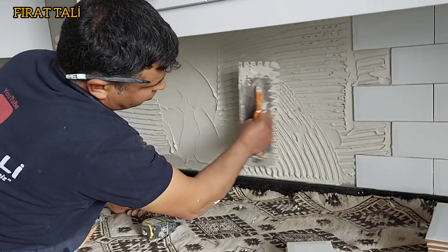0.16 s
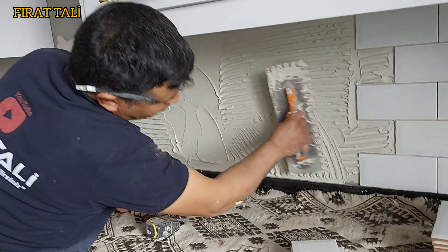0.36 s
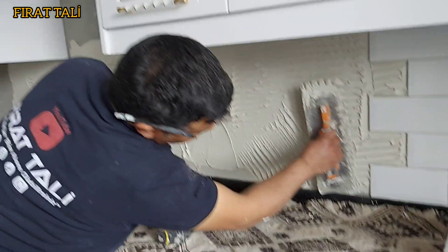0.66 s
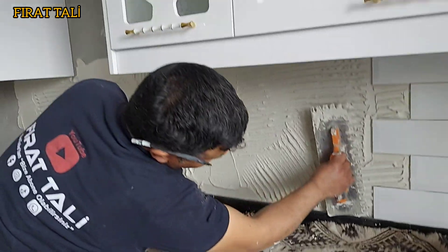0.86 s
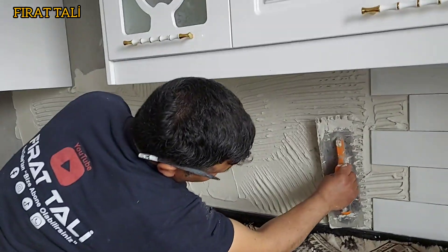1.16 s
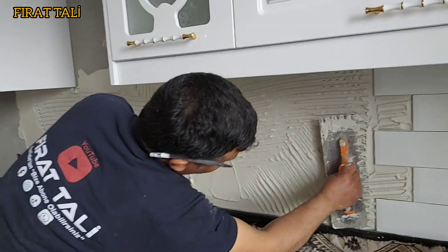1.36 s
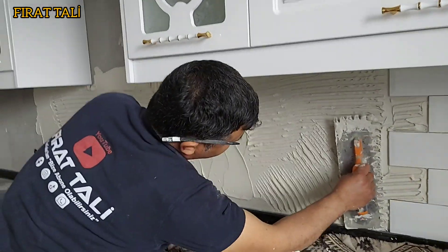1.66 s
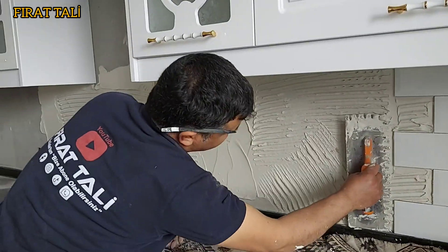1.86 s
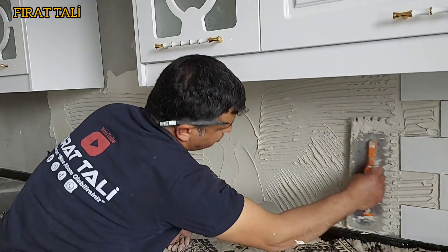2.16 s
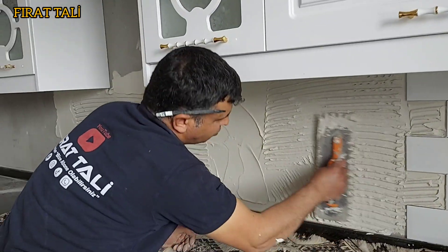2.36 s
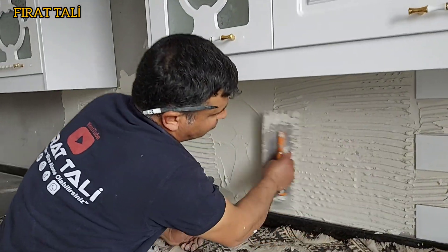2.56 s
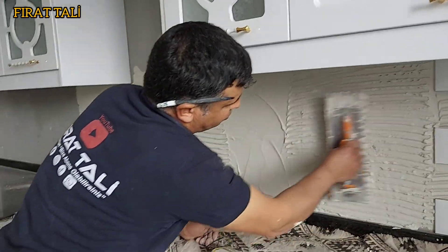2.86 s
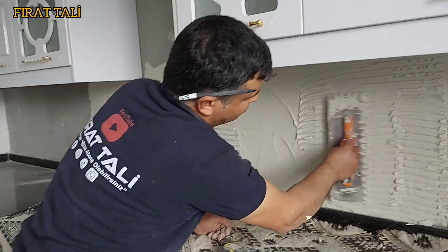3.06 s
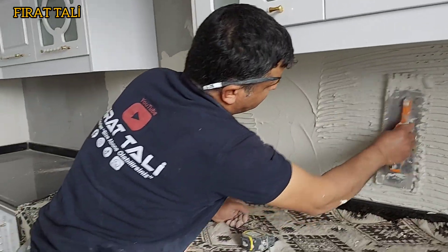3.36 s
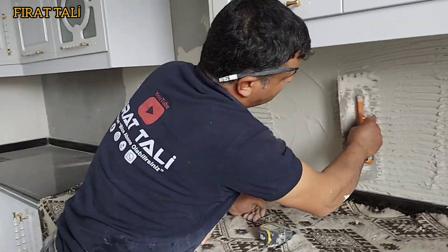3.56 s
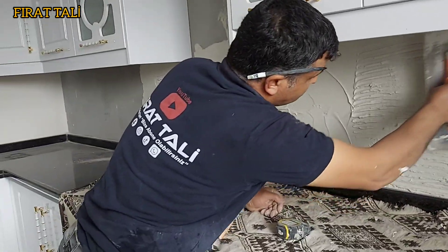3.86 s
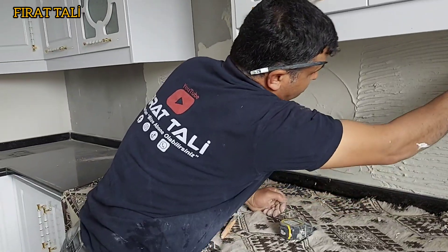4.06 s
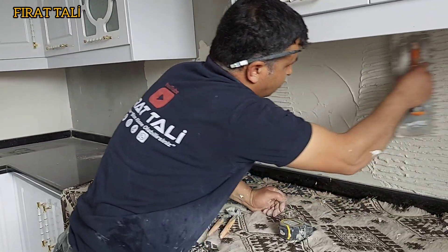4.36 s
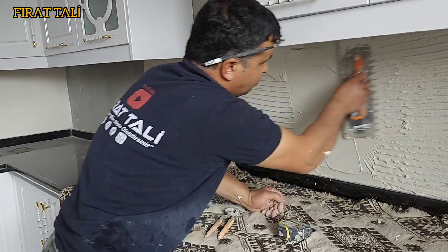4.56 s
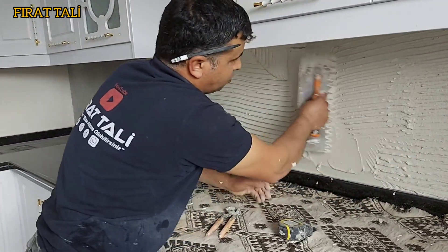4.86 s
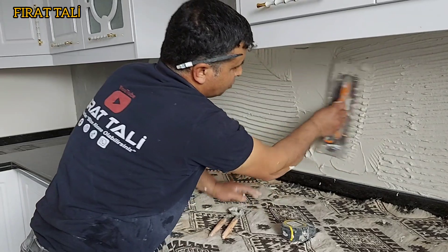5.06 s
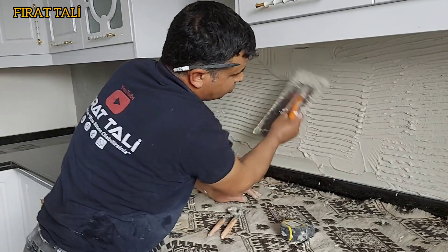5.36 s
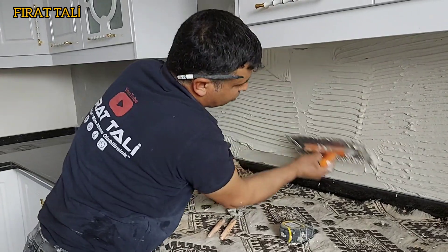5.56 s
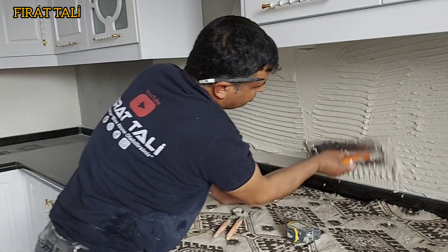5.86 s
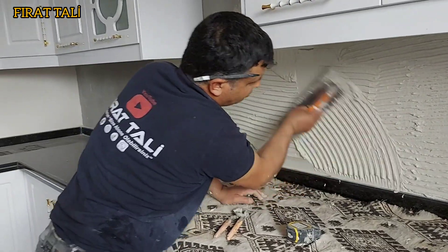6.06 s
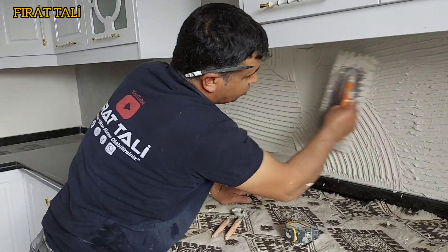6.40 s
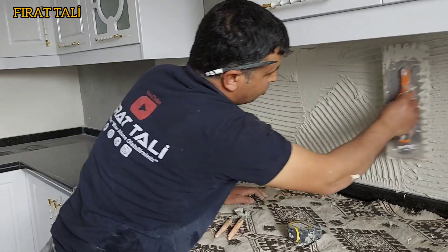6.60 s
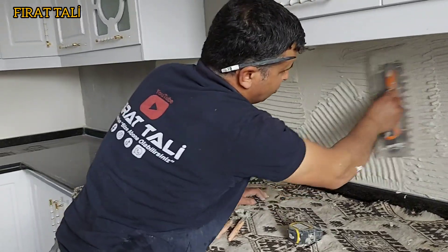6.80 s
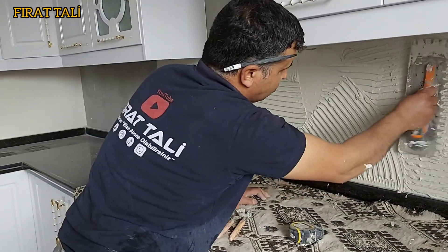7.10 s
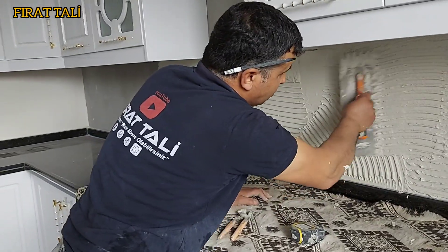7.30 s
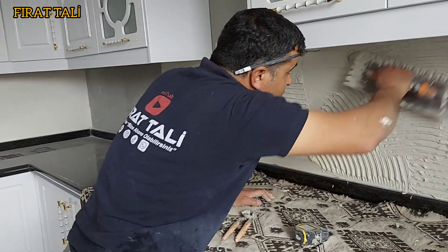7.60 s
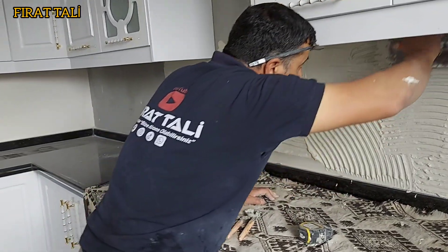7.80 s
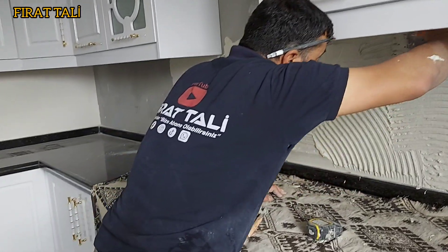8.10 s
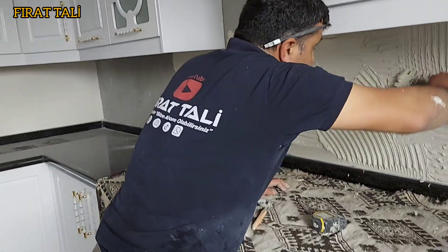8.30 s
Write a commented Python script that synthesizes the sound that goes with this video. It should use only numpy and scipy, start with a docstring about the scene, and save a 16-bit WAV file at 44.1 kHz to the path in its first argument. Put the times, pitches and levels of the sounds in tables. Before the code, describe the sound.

Sandy, hissing trowel scrapes repeat in a hard echoing kitchen, with metallic taps, soft cloth rustles and a quick run of hollow cabinet bumps.

```python
"""A bare, hard kitchen: a notched steel trowel combs tile adhesive over the wall, in long and short strokes.
Sand grains fracture under its teeth, wet paste hisses, and the blade hums, squeaks, ticks and rings in dying modes.
There is one chink, one clap on the wall, and a quick run of bumps on a hollow cabinet.
Clothes shuffle, or rustle and chirp close to the two microphones; soft booms lie below.
The room answers with decaying echoes, over still air and a faint appliance hum."""
import sys
import numpy as np
from scipy import signal
from scipy.fft import rfft, irfft, next_fast_len
from scipy.io import wavfile

SR = 44100
rng = np.random.default_rng(int(sys.argv[2]) if len(sys.argv) > 2 else 0)


def dump_mix(stems):
    """Bounce the given channels to the path in sys.argv[1] as a 16-bit WAV at rate SR."""
    frames = np.atleast_2d(stems).T  # one column per channel
    limited = np.clip(frames, -1, 1)  # hard clip at full scale
    pcm = np.round(limited * 32767).astype(np.int16)
    wavfile.write(sys.argv[1], SR, pcm)


N = 372182
TIME = np.arange(N) / SR  # s


def gain_of(db):
    """Decibels to a factor."""
    return 10 ** (np.asarray(db) / 20)


def evened(x):
    """Scales to rms 1."""
    return x / np.sqrt(np.mean(x ** 2) + 1e-20)


def read(points, hz):
    """Reads a table of (f/Hz, value) on a log-frequency axis."""
    f, value = np.transpose(points)
    return np.interp(np.log(hz + 1), np.log(f + 1), value)


def coloured(x, spectrum):
    """Gives x a spectrum, at rms 1."""
    size = next_fast_len(x.shape[-1])
    gain = gain_of(read(spectrum, np.fft.rfftfreq(size, 1 / SR)))
    return evened(irfft(rfft(x, size) * gain, size)[..., :x.shape[-1]])


def wander(per_s):
    """A random curve of rms 1 with per_s corners a second; it stays level after 4096 corners."""
    return evened(np.interp(TIME * per_s, np.arange(4096), rng.standard_normal(4096)))


def grains(per_s, spread_db):
    """Tiny fractures at random moments: many small, a few large."""
    size = gain_of(spread_db * np.minimum(rng.exponential(1, N), 5))
    sign = rng.choice([-1, 1], N)
    return evened(size * sign * (rng.random(N) < per_s / SR))


def swell(s, rise_s, hold_s, fall_s):
    """A gain that reaches 1 at s, holds, and falls; rise and fall are the times for a factor of ten."""
    early = np.maximum(s - TIME, 0)
    late = np.maximum(TIME - s - hold_s, 0)
    return 10 ** -np.minimum(early / rise_s + late / fall_s, 10)


def resonate(x, hz, width):
    """A resonance that follows the curve hz: shift it down to 0 Hz, smooth twice, shift back."""
    turn = np.exp(2j * np.pi * np.cumsum(hz) / SR)
    r = np.exp(-np.pi * width / SR)
    smooth = signal.sosfilt([[1 - r, 0, 0, 1, -r, 0]] * 2, x / turn)
    return evened((turn * smooth).real)


def add(mix, s, db, sound):
    """Places a blow whose energy equals that of 10 ms at the level db."""
    part = mix[round(s * SR):][:len(sound)]
    scale = np.sqrt(SR / 100 / np.sum(sound ** 2))
    part += (gain_of(db) * sound * scale)[:len(part)]


def ring(modes, tilt_db, split, count):
    """Dying modes, each a cluster of close pitches; tilt_db per octave above the first mode brightens them."""
    t = TIME[:SR // 3]
    hz, db, t60 = np.transpose(np.repeat(modes, count, axis=0))[:, :, None]
    shift, phase = 1 + split * rng.uniform(-1.26, 1, hz.shape), rng.random(hz.shape)
    level = gain_of(db + tilt_db * np.log2(hz / hz[0]))
    decay = np.exp(-np.log(1000) * t / t60)
    return np.sum(level * decay * np.sin(2 * np.pi * (hz * shift * t + phase)), 0)


# the trowel pressed along the wall: (t/s of full bite, rise/s, hold/s, fall/s,
# mid-stroke scrape level/dB, hum and hiss level/dB relative to the scrape)
STROKES = [(2.326, 0.18, 0.27, 0.042, -18.5, -12, -9.5), (3.065, 0.056, 0.064, 0.038, -20.5, -11.5, -8.5),
           (3.472, 0.041, 0.048, 0.071, -17, -7, -8), (4.28, 0.15, 0.24, 0.15, -19.5, -14.5, -9),
           (4.638, 0.3, 0.07, 0.06, -19.5, -4.5, -7), (5.155, 0.084, 0.046, 0.084, -18.5, -2, -9),
           (5.921, 0.096, 0.19, 0.041, -18, -10, -8.5), (6.811, 0.031, 0.058, 0.042, -23, -5.5, -6.5),
           (7.221, 0.054, 0.074, 0.097, -16.5, -9, -9.5), (8.215, 0.083, 0.042, 0.049, -17.5, -8.5, -12)]
# the blade skimming lightly between strokes: (t/s, hold/s, scrape level/dB, hum level/dB, hiss level/dB)
SKIMS = [(0, 0.0051, -26, -28, -44.5), (.16, 0.37, -56, -59, -69.5), (2.152, 0.02, -38.5, -47.5, -54.5),
         (2.72, 0.086, -50, -41.5, -63), (2.96, .06, -47, -46, -62), (3.252, .18, -37.5, -55, -47.5),
         (3.62, 0.19, -46.5, -44, -56.5), (3.883, 0.31, -51, -69, -57), (4.824, 0.14, -43.5, -50, -51),
         (5.039, 0.12, -36, -52, -38.5), (5.395, 0.18, -48, -65, -53), (5.777, 0.17, -47.5, -47, -51.5),
         (6.232, 0.14, -46.5, -49, -52.5), (6.556, 0.092, -45, -78, -50), (6.64, 0.018, -37, -83, -42.5),
         (6.743, 0.032, -49, -49, -43), (7.02, 0.07, -41.5, -41.5, -48.5), (7.424, 0.14, -46, -49, -53.5),
         (7.54, 0.28, -56, -76, -57.5), (7.977, 0.075, -46.5, -54.5, -49.5)]
# coarse sand under the teeth, relative: (f/Hz, level/dB per Hz)
GRIT = [(25, -55), (60, -39.5), (140, -21.5), (250, -15), (450, -11.5), (750, -5), (1300, -1.5),
        (2000, -0.5), (3200, 2), (4700, 3), (5600, 5), (6100, 4), (6900, -18.5), (9000, -27), (16000, -52)]
# fine hiss of wet paste, relative: (f/Hz, level/dB per Hz)
HISS = [(4000, -44), (6500, 1.5), (8000, -2), (10000, 1), (12000, 2.5), (14000, 1.5), (16000, -1)]
# the blade dragged along the wall: (f/Hz, width/Hz, relative level/dB)
BLADE_HUM = [(1041, 147, 3), (1358, 307, 2), (718, 366, -1.5)]
SWELL_DB = 3  # pressure grows through a stroke
LEAD_IN = 1.26  # the teeth first touch this many rise times before they bite fully
HUM_AT = 0.85  # share of a stroke after which the hum has its listed relative level
HUM_GROWTH_DB, HISS_LOSS_DB = 14.5, 3  # as the paste runs thin the blade hums more and the wet hiss dies
SKIM_RISE_S, SKIM_FALL_S = .05, 0.05


def scrape():
    """Sand grinds under the teeth in uneven catches; the drag sets the blade humming as it flexes."""
    catch = gain_of(1.2 * wander(110) + .5 * wander(30))
    grit = coloured(grains(per_s=7000, spread_db=2.5) * catch, GRIT)
    hiss = coloured(grains(per_s=9000, spread_db=2.0) * catch, HISS)
    drag = grains(per_s=1500, spread_db=3.5) * catch * gain_of(2 * wander(40))
    flex = 1 + 0.029 * wander(12)
    hum = evened(sum(gain_of(db) * resonate(drag, hz * flex, width) for hz, width, db in BLADE_HUM))
    power = np.zeros((3, N))  # of grit, hum and hiss
    for s, rise_s, hold_s, fall_s, db, hum_db, hiss_db in STROKES:
        done = np.clip((TIME - s) / (hold_s + fall_s / 2), 0, 1)
        press = swell(s, rise_s, hold_s, fall_s) * gain_of(db + SWELL_DB * (done - .5))
        press *= np.clip((TIME - s) / rise_s + LEAD_IN, 0, .5) * 2  # no contact before the approach
        power[0] += press ** 2
        power[1] += (press * gain_of(hum_db + HUM_GROWTH_DB * (done - HUM_AT))) ** 2
        power[2] += (press * gain_of(hiss_db - HISS_LOSS_DB * (done - .5))) ** 2
    for s, hold_s, *dbs in SKIMS:
        skim = swell(s, SKIM_RISE_S, hold_s, SKIM_FALL_S)
        power += np.outer(gain_of(dbs) ** 2, skim ** 2)
    return np.sum(np.sqrt(power) * [grit, hum, hiss], 0)


# the blade meets the wall: (t/s, tick level/dB, ring level/dB, ring brightness/dB per octave)
TAPS = [(.331, -24, -14, -2.5), (.357, -24, -11.5, -1), (.391, -46, -16, 22), (0.958, -50, -55, -13),
        (1.063, -42, -37.5, -24), (1.700, -39.5, -51, -6), (2.942, -39, -62, 10), (4.046, -47, -50, -4),
        (5.780, -37.5, -58, 14), (5.839, -28, -33, 12), (6.749, -26.5, -53, -4), (6.812, -29, -21.5, 12),
        (7.006, -30, -52, -7.5), (7.040, -24.5, -65, -7), (7.135, -39, -30.5, 1), (7.195, -34, -20, -4.5),
        (7.965, -34.5, -47, 8), (8.15, -34, -31, 8)]
# the blade when struck: (f/Hz, relative level/dB, longest t60/s)
BLADE = [(1668, -4.5, .05), (1767, -8.5, 0.12), (2250, -24, 0.043), (2430, -12, 0.04), (2600, -21.5, 0.032),
         (2996, -8, 0.093), (3660, -12, 0.049), (3920, -21, .05), (4720, -5, 0.18), (5100, -3.5, .04),
         (5630, 15.5, 0.042), (5620, 8, 0.057), (5800, -2, 0.06), (6200, -4, 0.15), (7600, -17, .04)]
# gritty contact, relative: (f/Hz, level/dB per Hz)
TICK = [(30, -51), (100, -8), (350, 3), (900, -7), (2300, 9), (4200, 8), (5800, 13), (7000, -15.5),
        (10000, -10), (16000, -26.5)]


def taps(tick_s=0.0038, buzz_db=-6, buzz_s=0.013):
    """The steel edge lands with a gritty tick; the blade rings in a smeared splash and buzzes on the sand."""
    out, t = np.zeros(N), TIME[:SR // 3]
    for s, tick_db, ring_db, tilt_db in TAPS:
        tick, buzz = coloured(rng.standard_normal((2, len(t))), TICK)
        # light touches stay in the paste, which damps the ring
        free = np.clip(gain_of(.6 * (ring_db + 11)), .35, 1)
        modes = np.multiply(BLADE, [1, 1, free])
        add(out, s, tick_db, tick * np.exp(-t / tick_s))
        add(out, s, ring_db + buzz_db, buzz * np.exp(-t / buzz_s))
        add(out, s, ring_db, ring(modes, tilt_db, split=0.0338, count=8))
    return out


# short glides, the blade singing low or squeaking on wet paste, and a chirp of cloth at 1.2 s:
# (t/s, length/s, start f/Hz, end f/Hz, level/dB, pitch jitter/Hz)
SQUEAKS = [(0, 0.038, 1043, 1058, -31, 80), (.968, .058, 2305, 1825, -52.5, 161),
           (1.057, 0.0152, 3200, 2380, -40, 200), (1.197, 0.015, 2660, 4190, -39.5, 80),
           (2.529, 0.069, 960, 1035, -25.5, 121.6), (3.103, 0.034, 1015, 1027, -30.5, 109.9),
           (3.266, 0.11, 1130, 1088, -43, 192), (4.231, 0.078, 1248, 1207, -30.5, 190.9),
           (4.317, 0.082, 1110, 1038, -29.5, 257.6), (4.418, .07, 1040, 1090, -31.5, 240),
           (7.133, 0.0068, 5550, 5350, -30, 150), (7.689, 0.062, 5980, 5770, -46, 110)]


def squeaks(waver=0.00616):
    """Short glides of the blade and one cloth chirp, rough early on; later the jitter is a steady offset."""
    out = np.zeros(N)
    for s, length, start_hz, end_hz, db, jitter_hz in SQUEAKS:
        u = np.clip((TIME - s) / length, 0, 1)
        glide = start_hz + (end_hz - start_hz) * u
        # at 1200 corners a second the jitter curve goes level at 3.4 s
        hz = glide * (1 + waver * wander(120)) + jitter_hz * wander(1200)
        out += gain_of(db) * 2 * np.sin(np.pi * u) * np.sin(2 * np.pi * np.cumsum(hz) / SR)
    return out


# a light, free chink of steel: (f/Hz, relative level/dB, t60/s)
CHINK = [(1785, -3.5, 0.29), (2760, -1, 0.12), (3200, 6, 0.11), (3430, 3, 0.15), (3640, 3, 0.08),
         (4650, 8, 0.084), (5400, -10, .06), (5960, -1, 0.072), (7800, -24, .2)]
# when it chinks: (t/s, level/dB)
CHINKS = [(1.699, -33.5)]
# the flat of the trowel on the wall: (f/Hz, relative level/dB, t60/s)
CLAP = [(807, 2, .07), (834, 0.5, 0.088), (1260, -4, 0.049), (2084, 7, 0.056), (2180, 2, 0.079),
        (2830, -17, 0.052), (4220, -7, 0.055), (5030, 5, 0.043), (5240, -12, .05)]
# when it claps: (t/s, level/dB)
CLAPS = [(7.965, -36)]
# the hollow cabinet: (f/Hz, relative level/dB, t60/s)
CABINET = [(134, -15, 0.14), (199, -12, .09), (229, -12.5, 0.32), (275, 8, 0.19), (305, -2, 0.18),
           (367, -15, 0.054), (434, 6.5, 0.069), (580, -1, 0.049), (683, -3, 0.054), (807, -11, 0.051),
           (895, -3, 0.045), (1240, -13.5, 0.061)]
# bumps against it: (t/s, level/dB, brightness/dB per octave)
BUMPS = [(4.045, -19, 4), (4.072, -16, -5.5), (4.121, -19, -8), (4.152, -21.5, -5), (4.176, -24, 3.5)]


def knocks():
    """Struck modes: a steel chink, the trowel clapping on the wall and stumbles against the hollow cabinet."""
    out = np.zeros(N)
    for s, db in CHINKS:
        add(out, s, db, ring(CHINK, 0, split=0.0142, count=5))
    for s, db in CLAPS:
        add(out, s, db, ring(CLAP, 0, split=0.058, count=5))
    for s, db, tilt_db in BUMPS:
        add(out, s, db, ring(CABINET, tilt_db, split=0.005, count=1))
    # small panels radiate little bass
    return signal.sosfilt(signal.butter(2, [70, 8000], "band", fs=SR, output="sos"), out)


# dull shuffling: (t/s at its height, rise/s, fall/s, level/dB, centre of its hollow colour f/Hz)
SHUFFLES = [(0, .02, 0.071, -41, 560), (.08, 0.026, .12, -33, 367), (0.389, 0.048, 0.053, -28, 374),
            (.44, 0.051, 0.031, -34, 337), (.86, 0.085, 0.28, -48, 252), (1.13, .13, .12, -32.5, 495),
            (1.345, 0.14, 0.032, -47, 269), (2.845, 0.026, 0.077, -31.5, 550),
            (2.888, 0.075, 0.051, -33.5, 307), (2.97, 0.054, .06, -40, 458), (4.72, 0.19, 0.14, -36, 400),
            (5.04, .05, 0.33, -43, 277), (5.21, 0.21, 0.047, -34, 487), (5.785, 0.012, 0.2, -42, 254),
            (5.93, 0.069, 0.18, -36, 433), (6.1, 0.16, 0.15, -33, 467), (7.07, 0.13, 0.16, -40, 515),
            (7.34, 0.16, 0.17, -39, 433), (7.97, .01, 0.35, -59, 470)]
# the dull part of its colour, relative: (f/Hz, level/dB per Hz)
SHUFFLE = [(25, -42), (70, -35), (160, -15.5), (250, 1), (500, -1.5), (750, -7), (1400, -12.5),
           (2500, -12.5), (4500, -23), (9000, -54)]


def shuffles():
    """Clothes slip softly and dully, with a hollow colour that shifts from move to move."""
    s, *_, hz = np.transpose(SHUFFLES)
    hollow = resonate(grains(per_s=900, spread_db=2.5), np.interp(TIME, s, hz), width=165)
    dull = coloured(grains(per_s=1500, spread_db=5.5), SHUFFLE)
    slips = evened(hollow + gain_of(0.5) * dull)
    moves = [gain_of(db) * swell(at, rise_s, 0, fall_s) for at, rise_s, fall_s, db, _ in SHUFFLES]
    return slips * np.max(moves, 0)


# cloth close by: (t/s at its height, rise/s, hold/s, fall/s, rustle level/dB, rumble level/dB)
RUSTLES = [(1.237, 0.17, .05, .08, -40.5, -59), (1.323, 0.053, 0.093, 0.11, -33.5, -51),
           (1.607, 0.013, .005, .06, -51, -54), (1.652, 0.054, 0.0063, 0.092, -42.5, -48)]
# rustling fibres, relative: (f/Hz, level/dB per Hz)
CLOTH = [(100, -2), (300, 6), (550, 0), (1100, -5), (1450, 0), (2400, 0), (3200, -7.5), (4500, -3),
         (5600, 6.5), (6800, -15), (9500, -17), (12200, -14), (16000, -25)]
# the low rumble beneath, relative: (f/Hz, level/dB per Hz)
RUMBLE = [(20, -24), (35, -8.5), (55, 0), (80, -2), (120, -5), (220, -14), (500, -38)]


def rustles():
    """Fibres catch and slip near the microphones, over a low rumble."""
    fibres = coloured(grains(per_s=6400, spread_db=1.5) * gain_of(2.1 * wander(70.03)), CLOTH)
    rumble = coloured(rng.standard_normal(N), RUMBLE)
    out = np.zeros(N)
    for *shape, db, rumble_db in RUSTLES:
        out += swell(*shape) * (gain_of(db) * fibres + gain_of(rumble_db) * rumble)
    return out


# deep booms: (t/s, hold/s, f/Hz, level/dB)
BOOMS = [(1.366, 0.06, 57.6, -47), (1.605, .015, 77.5, -54), (5.97, .3, 58, -63), (6.787, .07, 52, -62),
         (7.18, 0.069, 54.7, -64)]


def booms(rise_s=0.023, fall_s=0.048, waver=.05):
    """Soft, deep booms of wavering pitch as weight shifts on the worktop."""
    out = np.zeros(N)
    for s, hold_s, hz, db in BOOMS:
        turns = np.cumsum(hz * (1 + waver * wander(31))) / SR
        out += gain_of(db) * swell(s, rise_s, hold_s, fall_s) * np.sqrt(2) * np.sin(2 * np.pi * turns)
    return out


# likeness of the left and right channels, nearly mono above 7 kHz: (f/Hz, correlation from -1 to 1)
LIKENESS = [(50, -0.064), (250, 0.78), (550, 0.65), (900, -0.087), (1400, -0.48), (2400, 0.15),
            (3300, -0.34), (4500, -0.26), (6300, -0.35), (7000, 0.81), (16000, 0.94)]


def paired(two):
    """Makes two unrelated noises as alike as the two channels."""
    size = next_fast_len(two.shape[-1])
    a, b = rfft(two, size)
    same = np.clip(read(LIKENESS, np.fft.rfftfreq(size, 1 / SR)), -1, 1)
    return irfft(np.array([same * a + np.sqrt(1 - same ** 2) * b, a]), size)[:, :two.shape[-1]]


# how long the hard walls ring: (f/Hz, t60/s)
ROOM_T60 = [(100, 1), (300, 0.84), (1000, 0.75), (3000, 0.63), (5700, 0.47), (8000, 0.41), (15000, 0.22)]
# strength of the reflections, relative: (f/Hz, level/dB)
ROOM_WET = [(80, -5.5), (300, -7.5), (1000, 2.5), (5500, -2), (8000, -4), (15000, -5)]


def room(x, gap_s=.003):
    """Reflections from hard walls: sparse echoes after a short gap, each band dying at its own speed."""
    echoes = rng.standard_normal((2, SR)) * (rng.random((2, SR)) < 5000 / SR)
    hz, t, z = signal.stft(paired(echoes), SR, nperseg=256)
    t60 = read(ROOM_T60, hz)[:, None]
    decay = np.exp(-np.log(1000) * t / t60) * np.sqrt(2 * np.log(1000) / t60)  # equal energy for any t60
    z = z * gain_of(read(ROOM_WET, hz))[:, None] * decay
    tail = signal.istft(z, SR, nperseg=256)[1] / np.linalg.norm(echoes[0])
    tail = np.pad(tail, ((0, 0), (round(gap_s * SR), 0)))
    return signal.fftconvolve(x[None], tail, axes=1)[:, :N]


def moving_room(x, count=6):
    """Contact shifts along the long blade: echo patterns crossfade in a ring, five rounds a second."""
    turns = 5 * TIME
    shares = np.array([np.maximum(np.cos(2 * np.pi * (turns + k / count)) - .5, 0) for k in range(count)])
    shares /= np.linalg.norm(shares, axis=0)  # constant total power
    return sum(room(x * share) for share in shares)


# the quiet room, relative: (f/Hz, level/dB per Hz)
AIR = [(20, -33), (33, -18.5), (48, -23), (62, -0.5), (90, -9.5), (200, -9), (500, -11), (1500, -13.5),
       (5500, -14.5), (7000, -30), (16000, -37)]
AIR_DB = -60.5
# an appliance's hum: (f/Hz, level/dB)
HUM = [(65.5, -74), (166.9, -72), (333.8, -95)]


def air():
    """The still room as two-channel noise, with a faint appliance hum whose level drifts slowly."""
    hum = sum(gain_of(db) * np.sqrt(2) * np.sin(2 * np.pi * hz * TIME) for hz, db in HUM)
    still = gain_of(AIR_DB) * coloured(paired(rng.standard_normal((2, N))), AIR)
    return still + hum * gain_of(0.63 * wander(0.54))


def scene():
    """Rubbing is heard mostly through the room, blows and squeaks even more so; the cloth is close and dry."""
    rubbing = scrape() + shuffles()
    blows = taps() + knocks() + squeaks()
    cloth = rustles()
    direct = gain_of(-6.5) * rubbing + gain_of(-8.0) * blows + gain_of(-4) * cloth + booms()
    echoed = rubbing + gain_of(1.5) * blows + gain_of(-9.5) * cloth
    return direct + moving_room(echoed) + air()


# tone of the left microphone against the right: (f/Hz, left minus right level/dB)
BALANCE = [(50, -9.5), (130, -3), (1000, 0), (2200, -2.5), (3500, -2.5), (5500, -8.5), (7500, -6),
           (10000, -5.5), (16000, -8)]


def record(dry, low_cut_hz=32, edge_hz=15900):
    """The right microphone hears more bass and treble; the deepest bass and the highest treble are cut."""
    size = next_fast_len(N)
    lean = gain_of(read(BALANCE, np.fft.rfftfreq(size, 1 / SR)))
    ports = np.array([lean, np.ones_like(lean)]) * np.sqrt(2 / (1 + lean ** 2))  # total power kept
    heard = irfft(rfft(dry, size) * ports, size)[:, :N]
    heard = signal.sosfilt(signal.butter(2, low_cut_hz, "high", fs=SR, output="sos"), heard)
    band_limit = signal.firwin(511, edge_hz, window=("kaiser", 9), fs=SR)
    return signal.oaconvolve(heard, band_limit[None], "same")


dry = scene()
out = record(dry)
dump_mix(out)
```